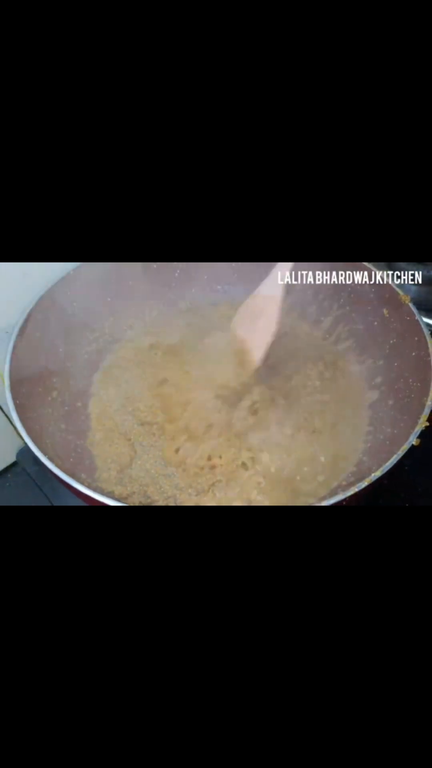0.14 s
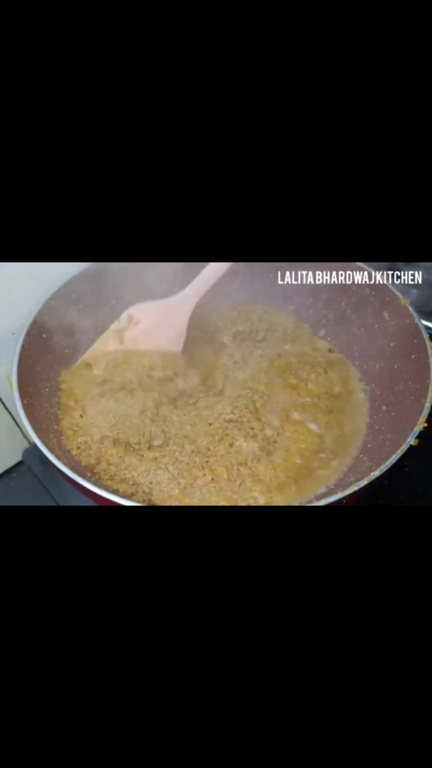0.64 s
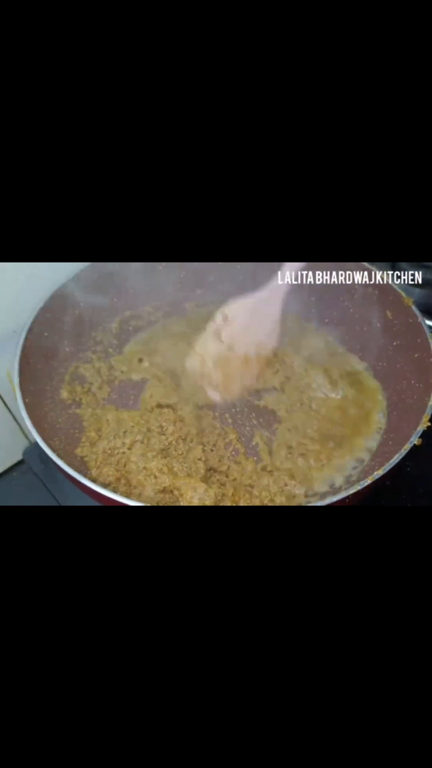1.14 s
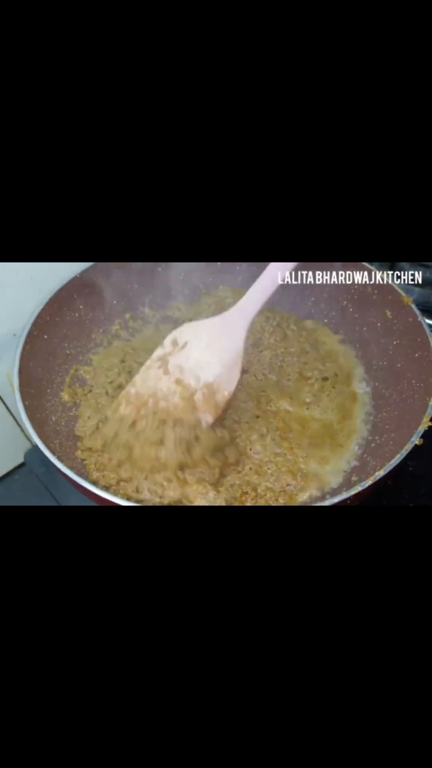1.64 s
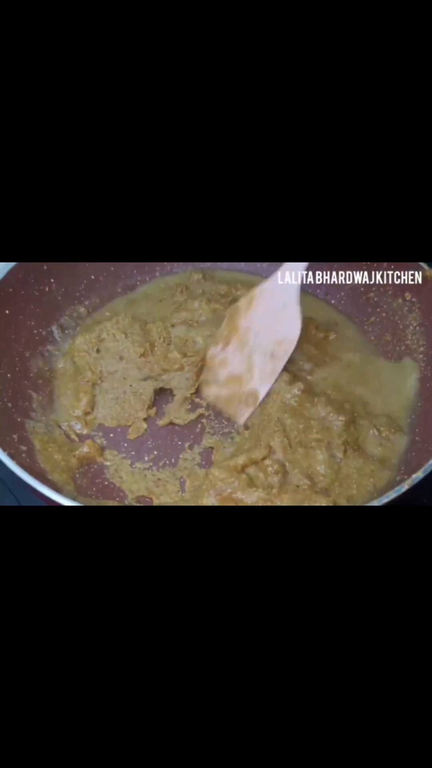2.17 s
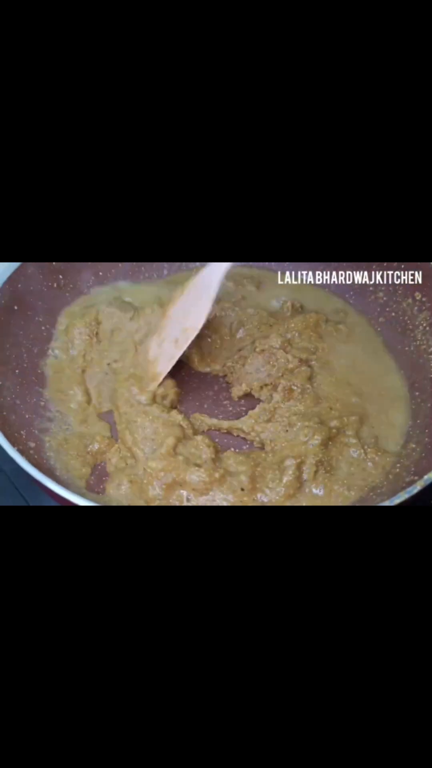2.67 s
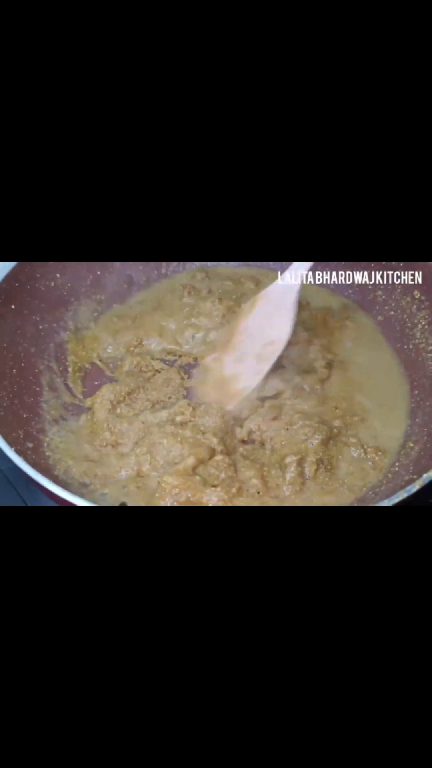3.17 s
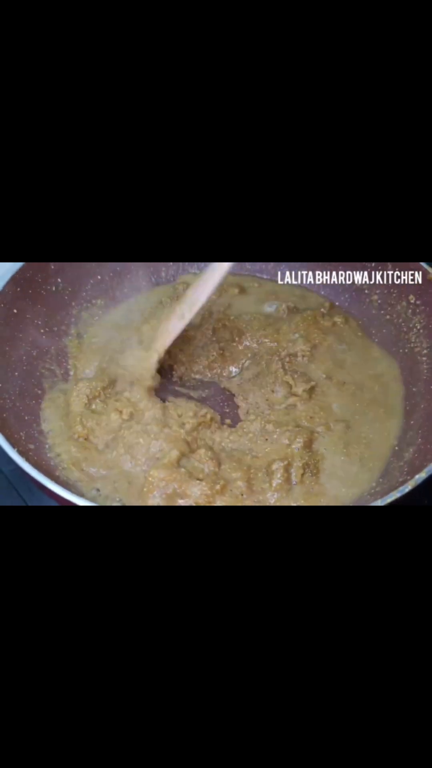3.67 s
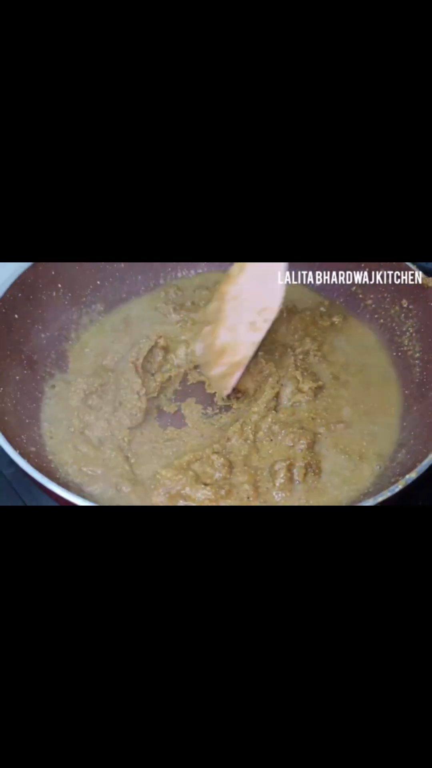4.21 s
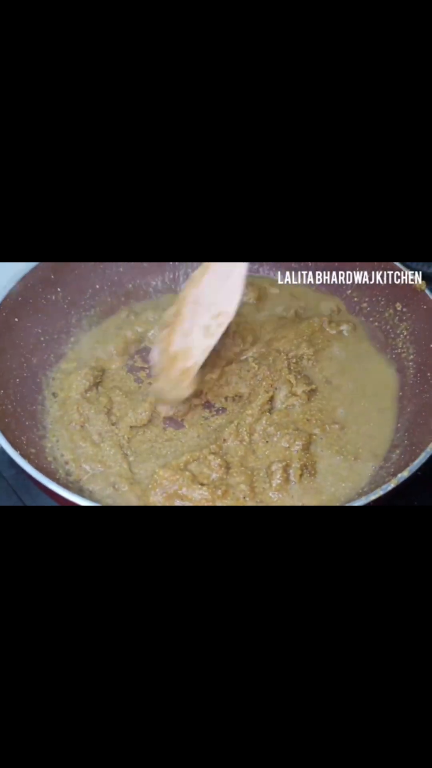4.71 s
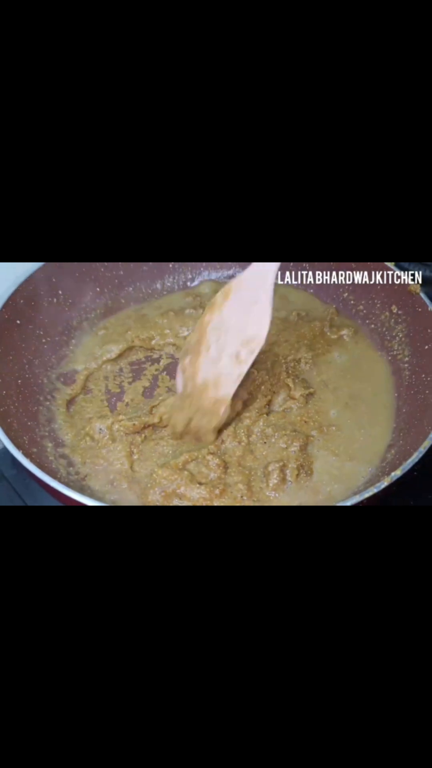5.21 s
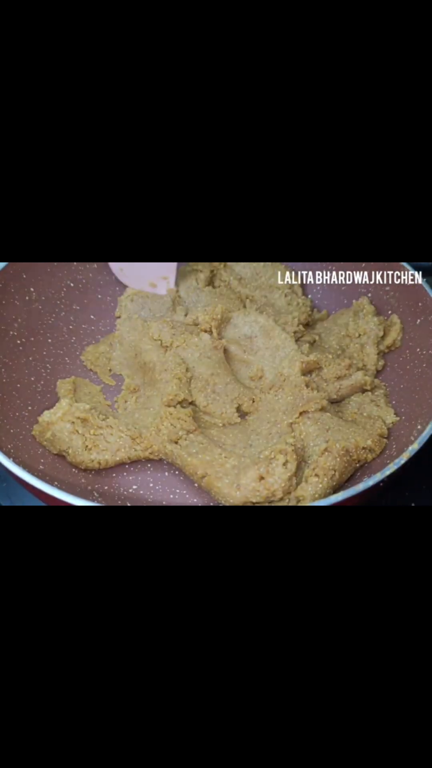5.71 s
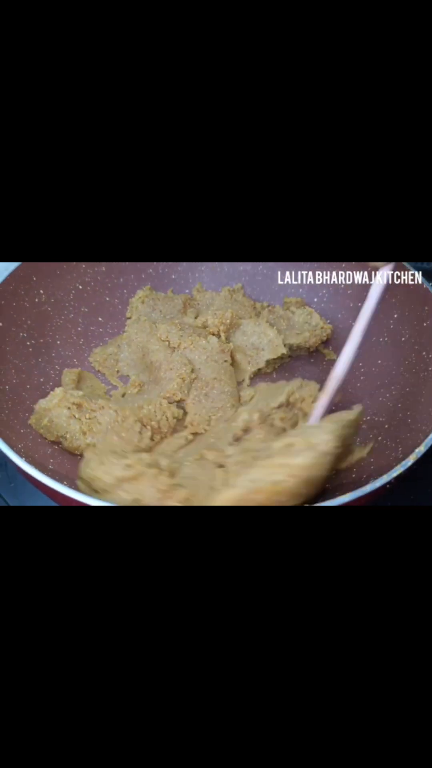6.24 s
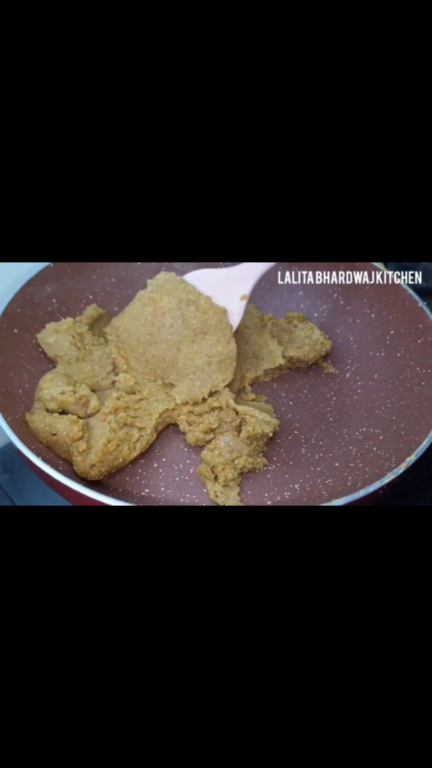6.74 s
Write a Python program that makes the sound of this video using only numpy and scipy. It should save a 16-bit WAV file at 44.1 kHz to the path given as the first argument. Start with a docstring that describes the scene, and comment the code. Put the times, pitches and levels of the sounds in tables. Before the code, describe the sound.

From 0 s, water boils violently off a hot pan of flour paste: a loud, dense, bright hiss of steam with grainy fizz and bursting bubbles. It stays strong to about 0.3 s, drops somewhat by 0.7 s, holds, then weakens towards 1.8 s, where a spatula faintly rubs. At 1.9 s the sound cuts abruptly to a much fainter simmer over low, fluttering burner rumble, with a soft wooden knock and pan shudder around 1.95-2.0 s. Tiny droplets snap near 2.2, 2.5, 2.9 and 3.6 s; light taps fall at 2.9 and 3.9 s. Around 4.1-4.3 s the spatula drags and judders, making hollow low knocks. Small taps and spits follow at 4.5-5.3 s as the fizz thins. A brief dip at 5.44 s leads to quiet sizzling, slightly fuller near 6 s, fading by the end. Close stereo, small kitchen.

```python
"""Steam hisses and bubbles burst as water boils off a hot pan of roasted flour and fat: loudly at first, then
faintly after two jumps in time. Patchy noise mixed with swarms of damped sines makes the boil; slower patchy
noise makes the burner's rumble. A wooden spatula drags, shudders and taps, driving the pan's modes; droplets
spit as short snaps and crackles. Two microphone ports a hand apart hear it in a small kitchen."""
import sys
import numpy as np
from scipy import signal
from scipy.fft import rfft, irfft, next_fast_len
from scipy.io import wavfile
from scipy.ndimage import uniform_filter1d, map_coordinates

SR = 44100
rng = np.random.default_rng(int(sys.argv[2]) if len(sys.argv) > 2 else 0)


def dump_mix(stems):
    """Bounce the given channels to the path in sys.argv[1] as a 16-bit WAV at rate SR."""
    frames = np.atleast_2d(stems).T  # one column per channel
    limited = np.clip(frames, -1, 1)  # hard clip at full scale
    pcm = np.round(limited * 32767).astype(np.int16)
    wavfile.write(sys.argv[1], SR, pcm)


def elevation(decibels):
    """Turn decibel levels (scalar or array-like) into linear amplitude ratios."""
    levels = np.asarray(decibels, float)
    return 10 ** (levels / 20)


N = 302526
TIME = np.arange(N) / SR
# jumps in time: [jump_s]
JUMPS_S = [1.897, 5.441]
STRETCH = np.searchsorted(JUMPS_S, TIME)  # 0, 1 or 2 per sample


def unit(x):
    """Scaled to rms 1."""
    return x / np.sqrt(np.mean(x ** 2) + 1e-20)


def along(points, hz, col=1):
    """One column of (Hz, ..) rows, read on a log axis."""
    table = np.transpose(points)
    return np.interp(np.log(hz + 1), np.log(table[0] + 1), table[col])


def wobble(knots_hz):
    """A smooth random curve through knots_hz random knots a second."""
    knots = rng.standard_normal(int(N * knots_hz / SR) + 4)
    return map_coordinates(knots, [TIME * knots_hz])


def filtered(x, response):
    """x times a complex response of frequency."""
    m = next_fast_len(N + SR // 2)
    return irfft(rfft(x, m) * response(np.fft.rfftfreq(m, 1 / SR)), m)[..., :N]


def ramp(seconds):
    """0 to 1 over the time in which contact is made or lost."""
    settle_s = 0.042
    return np.clip(seconds / settle_s, 0, 1)


def swell(peak_s, peak_db, rise_db_per_s, fall_db_per_s):
    """A gain that climbs to its peak and dies away, both steadily in dB."""
    since_s = TIME - peak_s
    return elevation(peak_db + np.where(since_s < 0, rise_db_per_s, -fall_db_per_s) * since_s)


def vigour():
    """The boil's vigour in dB, its swing about the mean of each stretch, and the mix of each stretch."""
    # how hard the paste boils, one list per stretch: [time_s, vigour_db]
    boil_points = [
        [(0.0, -20), (0.29, -19), (0.446, -23.5), (0.716, -26.5), (1.432, -27), (1.59, -28), (1.738, -31),
         (1.893, -29.5)],
        [(1.9, -46.5), (2.0, -47.5), (2.27, -50.5), (2.64, -51.5), (2.83, -53), (3.09, -53.5), (3.4, -53.5),
         (3.93, -56.5), (4.51, -57), (4.92, -59), (5.43, -58.5)],
        [(5.455, -56), (5.7, -56), (5.95, -54), (6.151, -54.5), (6.479, -56.5), (6.86, -58)],
    ]
    # each stretch at its mean vigour: [steam_over_fizz_db, bubbling_over_fizz_db, rumble_db]
    stretch_mixes = [(-1.5, -11.5, -54.5), (-4, -9.5, -58), (-3.5, -9, -56.5)]
    time_s, points_db = np.transpose(np.concatenate(boil_points))
    level_db = np.interp(TIME, time_s, points_db)
    mean_db = np.bincount(STRETCH, level_db) / np.bincount(STRETCH)
    return level_db, level_db - mean_db[STRETCH], np.transpose(stretch_mixes)[:, STRETCH]


def bursts(mid_hz, cycles, spread_db, count):
    """Two unrelated swarms of bursting bubbles: damped sines of scattered pitch and size that rise as they die."""
    t = np.arange(256) / SR
    size_draw, start_draw = rng.random((2, count, 1))
    hz = np.clip(mid_hz * np.exp(0.467 * rng.standard_normal((count, 1))), 100, SR / 3)
    turns = hz * t
    size = elevation(-spread_db * np.log(size_draw + 0.0051))
    rising = np.sin(2 * np.pi * turns * (1 + 0.13 * turns / cycles))
    grain = size * np.exp(-3 * turns / cycles) * rising
    # both swarms lie end to end, then split
    place = (start_draw * 2 * N).astype(int) + np.arange(len(t))
    both = np.bincount(place.ravel(), grain.ravel(), 2 * N + len(t))
    return unit(both[:2 * N].reshape(2, N))


def whitened(grains):
    """Grains with a flat spectrum, so that only their graininess is mixed in."""
    power = uniform_filter1d(np.abs(rfft(grains[0])) ** 2, size=3001)
    gain = (power + 1e-3 * power.max()) ** -0.5
    return unit(filtered(grains, lambda hz: np.interp(hz, np.fft.rfftfreq(N, 1 / SR), gain)))


def ports(pair):
    """The left port hears the pan later, directly and again off the counter; the rest differs from port to port."""
    # what the ports share, before the two paths: [pitch_hz, likeness_0_to_1, right_extra_lead_rad]
    likeness = [(30, 0.5, -4), (60, 0.99, 0), (199, 0.93, -0.16), (404, 0.4, 0.5), (510, 0.64, -6.5),
                (650, 0.53, 0), (830, 0.62, -0.85), (1300, 0.47, 0.9), (1565, 0.64, 0.5), (1715, 1, 0.3),
                (1740, 0.98, -1), (2020, 0.53, 0.26), (2310, 0, -1.5), (4500, 0.2, -1), (8500, 0.04, -0.5),
                (15000, 0.2, -2)]
    # level between ports: [pitch_hz, left_minus_right_db]
    balance = [(60, 2.5), (120, -2), (240, 4), (470, -4.5), (950, -4), (1880, -0.5), (3750, 2.5),
               (7480, -3.5), (14900, -1)]

    def shared(hz):
        direct = 0.77 * np.exp(-2j * np.pi * hz * 0.0003)
        off_counter = 0.45 * np.exp(-2j * np.pi * hz * 0.000439)
        paths = direct + off_counter
        paths = paths / np.maximum(np.abs(paths), 0.9)
        return np.clip(along(likeness, hz), 0, 0.99) * paths * np.exp(-1j * along(likeness, hz, col=2))

    own = filtered(pair[1], lambda hz: np.sqrt(np.abs(1 - np.abs(shared(hz)) ** 2)))
    left = filtered(pair[0], shared) + own
    return filtered(np.array([left, pair[0]]), lambda hz: elevation(along(balance, hz) / 2 * [[1], [-1]]))


def rush(spectrum, patchy_db, grains=None, share=0):
    """Noise in random patches, partly grains, spread over two ports and coloured; the ports' mean has rms 1."""
    z = signal.stft(rng.standard_normal((2, N)), nperseg=512)[2]
    patches = uniform_filter1d(rng.standard_normal(z.shape[1:]), size=8, axis=0)
    patches = uniform_filter1d(patches, size=10, axis=1)
    pair = unit(signal.istft(z * elevation(patchy_db * unit(patches)), nperseg=512)[1][:, :N])
    if grains is not None:
        pair = np.sqrt(1 - share) * pair + np.sqrt(share) * whitened(grains)
    pair = ports(pair)
    colours = []
    for k in (1, 2, 3):  # one column of the spectrum per stretch
        colour = filtered(pair, lambda hz: elevation(along(spectrum, hz, col=k)) * (hz > spectrum[0][0]))
        colours.append(colour / np.sqrt(np.mean(colour.mean(0) ** 2)))
    return np.choose(STRETCH, colours)


def standing_waves(x, depth_db):
    """Echoes between pan, hob and walls lay a fixed fine ripple over the spectrum."""
    length = SR // 8
    tail = unit(rng.standard_normal(length) * elevation(-60 * TIME[:length] / 0.07))
    echoes = tail * elevation(depth_db) / np.sqrt(length)
    echoes[0] = 1
    return signal.fftconvolve(x, echoes[None] / np.linalg.norm(echoes), axes=1)[:, :N]


def boiling():
    """Fizz, steam and larger bubbles swell together as wet paste meets hot metal, and each flutters alone."""
    # colours by stretch, all three: [pitch_hz, first_db, second_db, third_db]
    fizz_colour = [(890, -47, -34, -40), (1610, -8, -10.5, -21), (2430, -2.5, 0.5, -1),
                   (2800, -2, -0.5, -2), (3800, -1, -1, -2), (4150, 2, 0.5, -0.5), (4500, -1, 1, -1.5),
                   (5460, 0, 0.5, 1), (5980, -4, -2, -4), (6500, -3, -1.5, 0), (7230, -4.5, -5, -2.5),
                   (7700, -2.5, -1.5, -3), (8650, -11, -17, -11), (11100, -30, -25, -15)]
    steam_colour = [(6100, -22, -36, -36.5), (7960, -6.5, -3, -5), (9100, -6, -3.5, -3.5),
                    (9900, -5, -2, -4), (10950, -6, -4, -6), (11400, -2, -3.5, -2), (11850, 0.5, 3, 1),
                    (12400, -1, -1.5, 1), (13700, -3, -4, -2), (14500, -7.5, -3, -3),
                    (15400, -3.5, -10, -6), (15600, -12, -13, -10)]
    bubble_colour = [(147, -53, -40, -40), (236, -18.5, -7, -14), (272, -17, -12.5, -13),
                     (397, -26.5, -17.5, -15), (429, -7.5, -6, -4), (452, -16.5, -7, -7),
                     (574, -12.5, -2.5, -9), (583, -9, -4.5, -6.5), (925, -5.5, -2.5, -8),
                     (1270, -2, 0, 0.5), (1394, 2, 0.5, 0.5), (1510, -1, -3.5, -4), (1850, -5, 3.5, 2),
                     (2580, -19.5, -24, -39)]
    steam_grows, bubbles_grow = 1.08, 0.76  # dB per dB of vigour
    fizz_db, swing_db, (steam_mix_db, bubble_mix_db, _) = vigour()
    steam_db = fizz_db + steam_mix_db + (steam_grows - 1) * swing_db
    bubble_db = fizz_db + bubble_mix_db + (bubbles_grow - 1) * swing_db

    surge_db = 0.07 * wobble(5.9) + 0.5 * wobble(30)
    fizz_gain = elevation(fizz_db + surge_db + 0.83 * wobble(9.4))
    steam_gain = elevation(steam_db + surge_db + 0.53 * wobble(27))
    bubble_gain = elevation(bubble_db + 0.81 * surge_db + 0.35 * wobble(13))

    fizz = fizz_gain * rush(fizz_colour, 0.53, bursts(3950, 3.6, 2.0, count=16000), 0.21)
    steam = steam_gain * rush(steam_colour, 0.4, bursts(10800, 2.4, 3.9, count=16000), 0.14)
    bubbles = bubble_gain * rush(bubble_colour, 1.06, bursts(1104, 15, 1.0, count=9000), 0.28)
    return standing_waves(fizz + steam + bubbles, depth_db=-14)


def burner():
    """The low, fluttering rumble of flame and pan, stronger as the paste boils harder within a stretch."""
    # colour by stretch: [pitch_hz, first_db, second_db, third_db]
    rumble_colour = [(15, -32, -26, -32), (45, -10, -18, -20), (70, -13, -8.5, -9), (95.5, 2.5, 0, 0),
                     (112, -2.5, -1.5, 6), (134, -2, -5.5, -5.5), (180, -4, -7, -9), (241, -18, -19.5, -19),
                     (334, -6, -10, -11), (395, -22, -20, -19.5), (796, -22, -22.5, -24.5),
                     (1500, -43, -54, -40)]
    rumble_grows = 0.43  # dB per dB of vigour
    _, swing_db, (_, _, rumble_db) = vigour()
    flutter_db = 1.2 * wobble(6)
    return elevation(rumble_db + rumble_grows * swing_db + flutter_db) * rush(rumble_colour, 0.96)


def pan(force):
    """The pan's modes, damped resonances of alternating sign, answer a force."""
    # the pan with its load: [mode_hz, width_hz, level_db]
    pan_modes = [(65.5, 49, 0.5), (117, 27, 5.5), (165, 39, 3.5), (234, 37, -1.5), (325, 20, 3),
                 (434, 4.2, 4), (596, 7.7, -11.5), (668, 31, -14.5), (757, 21, -11), (880, 25, -12.5),
                 (1024, 47, -23), (1186, 35, -22), (1400, 84, -18)]

    def response(f):
        total = 0
        for k, (mode_hz, width_hz, level_db) in enumerate(pan_modes):
            damping = 1j * f * width_hz
            total = total + (-1) ** k * elevation(level_db) * damping / (mode_hz ** 2 - f ** 2 + damping)
        return total

    return filtered(force, response)


def drags():
    """The blade rubs over the pan: noise through the modes, climbing fast, sagging, then let go."""
    # strokes: [peak_s, level_db, rise_s, drag_lasts_s]
    strokes = [(1.814, -55, 0.02, 0.07), (1.945, -50.5, 0.01, 0.03), (4.107, -41.5, 0.047, 0.17)]
    settle_s, climb_db, sag_db_per_s = 0.042, 25, 71
    noise = filtered(rng.standard_normal(N), lambda hz: hz / (hz + 400) / (1 + (hz / 1300) ** 4))
    gain = np.zeros(N)
    for peak_s, level_db, rise_s, lasts_s in strokes:
        let_go = ramp(peak_s + lasts_s + settle_s - TIME)
        gain += swell(peak_s, level_db, climb_db / rise_s, sag_db_per_s) * let_go
    return unit(pan(noise)) * gain


def shudders():
    """The pan rocks on its stand: two close wobbles beat, swell and die."""
    # shudders: [peak_s, level_db, lower_pitch_hz, rise_db_per_s]
    shudder_events = [(2.015, -40, 140.4, 47), (4.15, -43, 108, 253)]
    builds_s, lasts_s, fall_db_per_s = 0.09, 0.099, 113
    beat_hz, upper_db = 31.2, -3  # second wobble over the first
    out = np.zeros(N)
    for peak_s, level_db, lower_hz, rise_db_per_s in shudder_events:
        rocks = ramp(TIME - peak_s + builds_s) * ramp(peak_s + lasts_s - TIME)
        turn = 2 * np.pi * (TIME - peak_s)
        beat = np.cos(lower_hz * turn) + elevation(upper_db) * np.cos((lower_hz + beat_hz) * turn)
        out += swell(peak_s, level_db, rise_db_per_s, fall_db_per_s) * rocks * beat
    return out


def jolts():
    """The blade catches: each smooth push of force sets the pan's modes ringing."""
    # jolts: [start_s, relative_level_db, contact_ms]
    jolt_events = [(1.815, -35, 1.5), (1.86, -44, 4.6), (1.944, -37, 2.2), (4.072, -40, 0.6),
                   (4.09, -36, 0.67), (4.105, -32, 1.5), (4.133, -34, 7), (4.146, -32, 3.1),
                   (4.164, -48, 1.9), (4.194, -33, 2.5), (4.234, -42, 2.2), (4.264, -38, 5.6),
                   (4.291, -51, 5)]
    force, t = np.zeros(N + SR), TIME[:SR // 5]
    for start_s, level_db, contact_ms in jolt_events:
        since_push = t / (contact_ms / 4000)  # peaks after a quarter of the contact
        push = since_push * np.exp(-since_push)
        force[round(start_s * SR):][:len(t)] += elevation(level_db + 36) * push / np.sum(push)
    return pan(force[:N])


def spatula():
    """Drags rub and jolt the pan's modes, and the pan throbs as it rocks."""
    return drags() + shudders() + jolts()


def taps():
    """Each tap clicks at the blade's own pitch and knocks the pan."""
    # spatula taps: [start_s, relative_level_db, blade_pitch_hz, ring_t60_s]
    tap_events = [(1.947, -36.5, 475, 0.031), (1.986, -39, 1300, .03), (2.947, -42, 937, 0.012),
                  (3.874, -37, 1400, 0.011), (4.509, -40, 627, 0.033), (4.896, -48, 853, .03),
                  (4.922, -51, 895, 0.027), (5.349, -50.5, 1250, 0.028)]
    out, force, t = np.zeros(N + SR), np.zeros(N), TIME[:SR // 5]
    for start_s, level_db, hz, t60_s in tap_events:
        tones = np.sin(2 * np.pi * hz * t) + 0.5 * np.sin(2 * np.pi * 1.3 * hz * t)
        blade = tones * elevation(-60 * t / t60_s)
        crack = 0.45 * rng.standard_normal(len(t)) * elevation(-60 * t / 0.006)
        onset = 1 - np.exp(-t / 0.00037)
        out[round(start_s * SR):][:len(t)] += elevation(level_db) * (blade + crack) * onset
        force[round(start_s * SR)] = elevation(level_db + 27)
    return out[:N] + pan(force)


def spits():
    """Each droplet snaps, a damped sine, then crackles briefly in a noise band around its pitch."""
    # droplets that spit: [start_s, relative_level_db, pitch_hz, crackle_decay_s]
    spit_events = [(2.236, -33, 7800, .006), (2.537, -31, 4800, .005), (2.908, -41, 11800, .01),
                   (2.976, -40, 11800, 0.0073), (3.572, -27.5, 3570, 0.0035), (4.6905, -38.5, 12200, .003),
                   (4.7694, -51, 4180, .006), (4.897, -40, 5340, .008), (4.927, -40, 4270, .003)]
    out, t = np.zeros(N + SR), TIME[:SR // 10]
    for start_s, level_db, hz, decay_s in spit_events:
        band = signal.butter(2, [hz / 1.6, min(hz * 1.35, SR / 2.4)], "band", fs=SR)
        crackle = unit(signal.lfilter(*band, rng.standard_normal(len(t)))) * np.exp(-t / decay_s)
        snap = np.sin(2 * np.pi * hz * t) * np.exp(-t * hz / 2)
        out[round(start_s * SR):][:len(t)] += elevation(level_db) * (snap + 0.49 * crackle)
    return out[:N]


def kitchen(x):
    """The walls' answer: decaying noise, each frequency dying at its own speed."""
    # reverberation: [pitch_hz, t60_s]
    decay = [(150, 0.045), (1000, 0.23), (8000, 0.15)]
    hz, t, z = signal.stft(rng.standard_normal((2, SR // 2)), SR, nperseg=256)
    tail = signal.istft(z * elevation(-60 * t / along(decay, hz)[:, None]), SR, nperseg=256)[1]
    delayed = np.pad(x, (300, 0))  # samples
    return signal.fftconvolve(delayed[None], tail / np.linalg.norm(tail[0]), axes=1)[:, :N]


def scene():
    """Taps and droplets reach the right port first; the shaken pan booms into both."""
    boil, rumble = boiling(), burner()
    boom = spatula()
    clicks = taps() + spits()
    boom_pair = boom * elevation([[1.5], [-1.5]])
    click_pair = np.array([elevation(-6.0) * np.roll(clicks, shift=4), elevation(2.5) * clicks])
    return boil + rumble + boom_pair + click_pair + elevation(-5.5) * kitchen(boom + clicks)


def roll_off(x):
    """The treble ends steeply here."""
    return signal.sosfilt(signal.butter(12, 15500, fs=SR, output="sos"), x)


def record(dry):
    """The second jump in time is a quick fade out and in."""
    fade_out = (JUMPS_S[1] - TIME) / 0.007
    fade_in = (TIME - JUMPS_S[1]) / 0.013
    fade = np.clip(np.maximum(fade_out, fade_in), 0.06, 1)
    return roll_off(dry * fade)


dry = scene()
out = record(dry)
dump_mix(out)
```